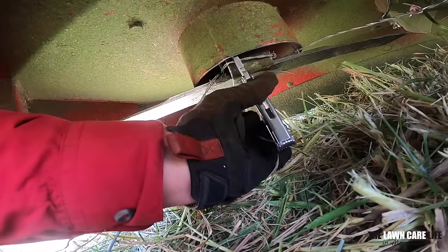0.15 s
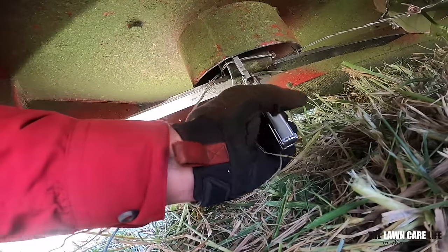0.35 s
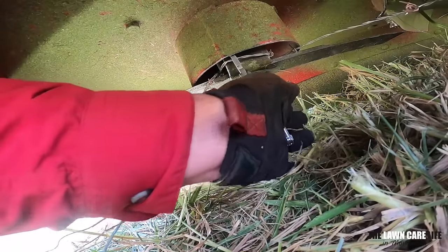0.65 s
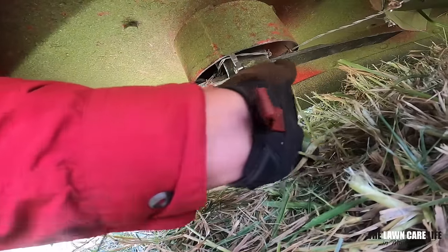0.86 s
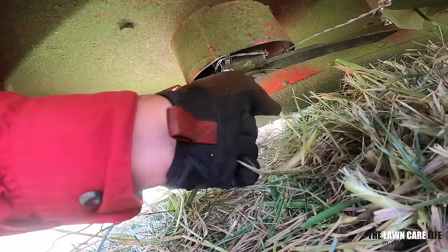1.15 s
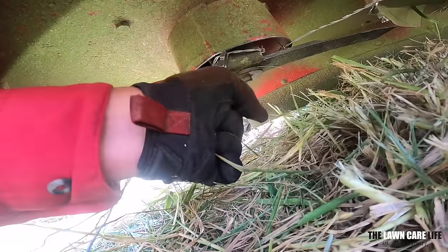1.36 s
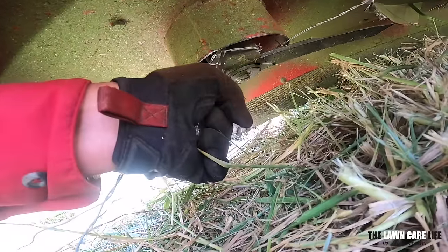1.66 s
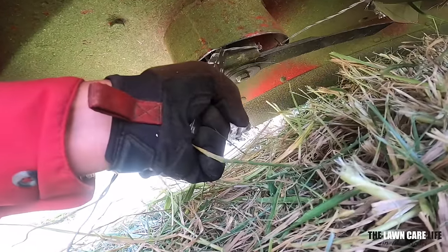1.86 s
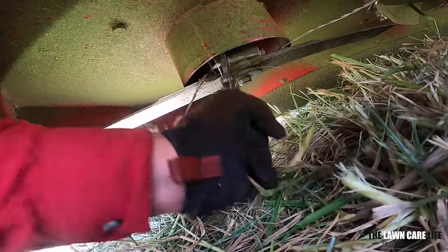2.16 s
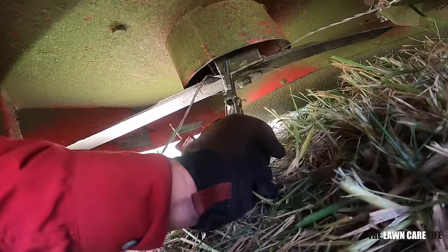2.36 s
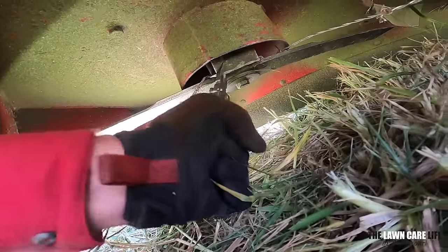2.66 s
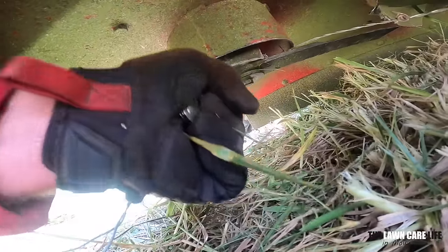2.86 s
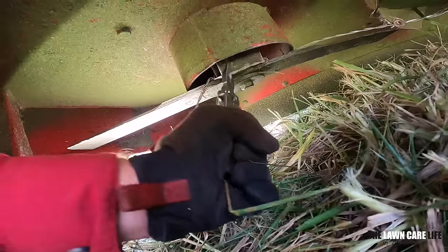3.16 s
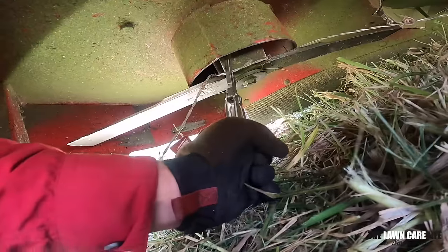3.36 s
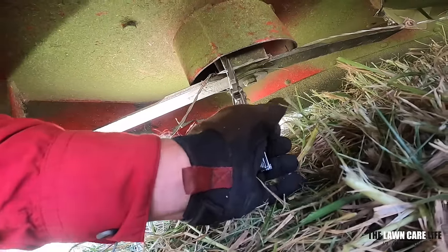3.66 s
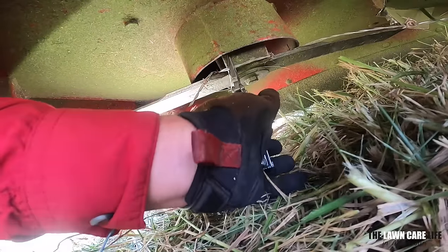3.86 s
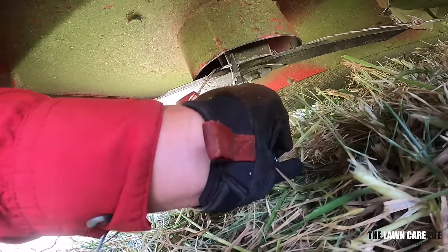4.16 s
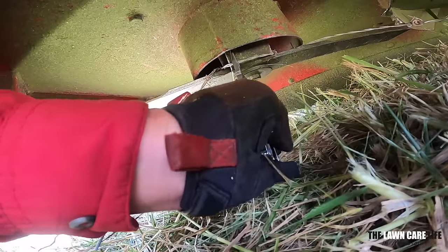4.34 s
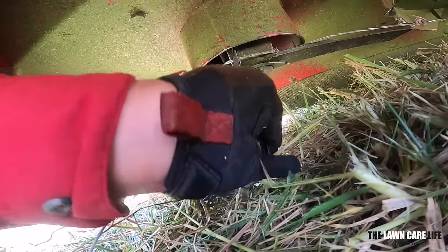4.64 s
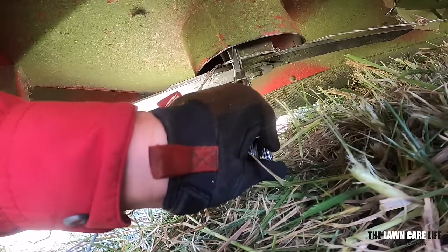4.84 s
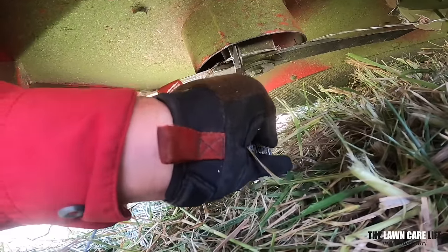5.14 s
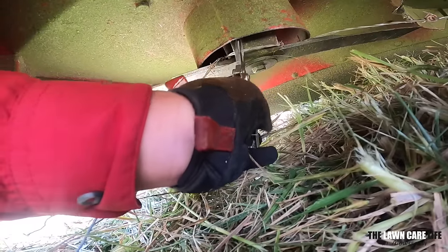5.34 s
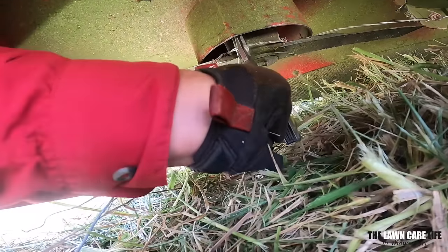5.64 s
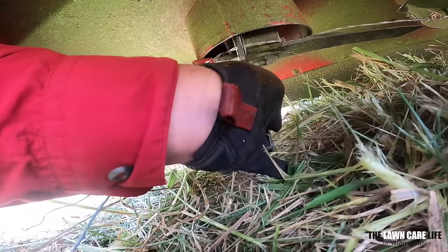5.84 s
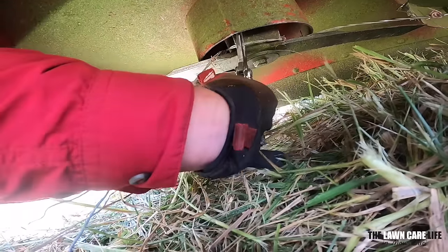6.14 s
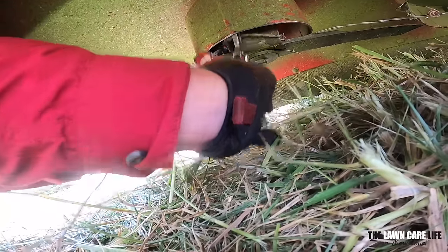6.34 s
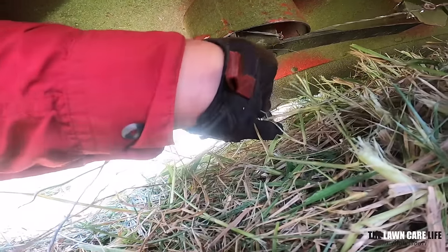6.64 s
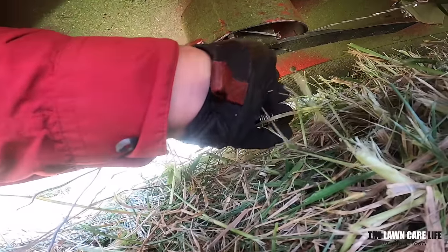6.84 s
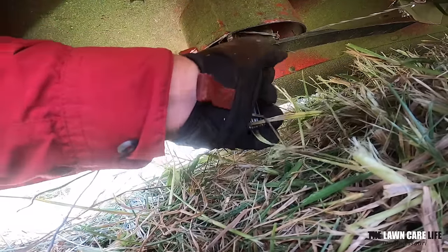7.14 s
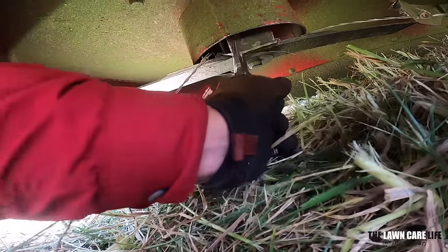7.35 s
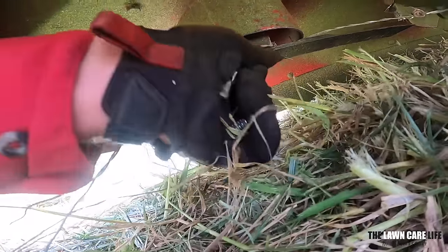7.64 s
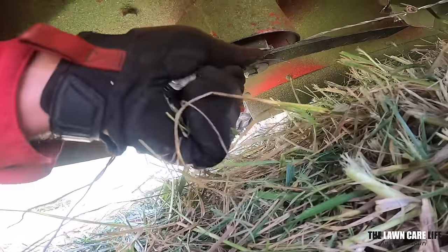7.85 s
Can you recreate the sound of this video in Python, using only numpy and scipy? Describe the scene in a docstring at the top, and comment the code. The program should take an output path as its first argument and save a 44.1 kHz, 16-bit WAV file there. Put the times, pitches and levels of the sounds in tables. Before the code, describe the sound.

Pliers pull and cut wire wound round a mower blade, heard close up beneath the steel deck. Gritty clanks and sharp snaps come in uneven clusters, each knock briefly ringing the blade and thumping the deck. After a quieter stretch of light ticks and glove rustle in grass, hard knocks crowd in and the wire grates on steel. Faint insects on the left and a far rumble continue throughout.

```python
"""Pliers pull and cut wire wound round a mower blade, heard from under the steel deck.
From the start, glove and grass rustle over insects on the left and a far rumble with a faint hum.
At 0.9-3.4 s wire and jaws slip in clusters: each grit burst rings blade and pliers and thumps the deck;
hard knocks shake the camera. Strands or stalks snap. Light knocks follow; from 6.3 s hard ones
crowd in, and the wire drags loudest near 7.6 s."""
import sys
import numpy as np
from scipy import signal
from scipy.fft import rfft, irfft
from scipy.io import wavfile

SR = 44100
rng = np.random.default_rng(int(sys.argv[2]) if len(sys.argv) > 2 else 0)


def wav_record(signal):
    """Record a signal, one row per channel, as 16-bit PCM in the file named by sys.argv[1]."""
    frames = np.transpose(np.atleast_2d(signal))
    bounded = np.clip(frames, -1, 1)
    # unit amplitude maps onto the largest positive 16-bit level
    quanta = np.round(bounded * 32767).astype(np.int16)
    wavfile.write(sys.argv[1], SR, quanta)


N = 352800

# wire or jaw slips: t/s, level/dB, bite f/Hz, treble/dB, thump f/Hz, thump/dB, blade f/Hz, blade/dB,
# pliers/dB, grit t60/s; treble, blade and pliers relative to level; the 28 Hz thump is a camera jolt
SLIPS = [(0.155, -31, 1950, -36, 221, -60, 1534, -45, -33, 0.25),
         (0.78, -67, 2000, -20, 292, -41, 700, -25, -30, 0.069),
         (0.8645, -9.5, 2140, -19, 278, -17, 936, -20.5, -20.5, 0.063),
         (0.9131, -11.5, 2170, -21, 292, -19.5, 1190, -35, -33, 0.073),
         (0.9286, -8.5, 3060, -36, 297, -16, 1160, -28, -38, 0.04),
         (1.289, -10.5, 3390, -37, 213, -33.5, 1190, -28, -36, 0.073),
         (1.4655, -42, 3060, -18, 300, -55, 1130, -31, -7, 0.13),
         (2.0497, -77, 2060, -27, 296, -38, 522, -25, -33, 0.018),
         (2.098, -57, 950, -25, 96, -33, 940, -31, -33, 0.03),
         (2.1792, -34, 1510, -29, 259, -29.5, 910, -19, -25, 0.061),
         (2.2457, -26, 3200, -20, 288, -30.5, 923, -19, -12, 0.29),
         (2.272, -45, 1120, -20, 28, -24, 1110, -25, -32, 0.023),
         (2.278, -3, 3180, -2.5, 219, -19, 1425, -27, -26, 0.062),
         (2.5201, -36, 2110, -22, 231, -57, 1376, -13, -10, .14),
         (2.6603, -32.5, 3000, -2, 234, -54, 1390, -19, -28, 0.35),
         (2.7554, -8.5, 3650, -40, 217.7, -15.5, 1393, -25, -28, 0.064),
         (2.9038, -29, 2050, 0.5, 222, -29, 1400, -19, -11, 0.15),
         (2.94, -16.5, 2300, -25, 247, -32, 1470, -34, -25.5, 0.03),
         (2.969, -22.5, 2020, -3, 238, -39, 1120, -30, -44, 0.042),
         (3.3642, -13.5, 3720, -2, 216, -29.5, 1390, -26.5, -19.5, .1),
         (3.4072, -21.5, 3940, 1, 285, -31.5, 910, -26, -22, .11),
         (4.6187, -44, 1490, -24, 250, -46, 1403, -14, -26, .059),
         (4.7368, -32, 2780, 7.5, 212, -43.5, 1460, -31, -8, 0.039),
         (4.77, -31, 2960, -9, 214, -53, 1490, -42, -29, 0.051),
         (4.9225, -48, 4200, 10, 225, -50, 1420, -34, -28, 0.13),
         (5.416, -53.5, 1480, -20, 213, -51, 1420, -16, -28, 0.058),
         (5.6452, -36.5, 2310, -3, 210, -50.5, 1060, -34, -22, 0.11),
         (6.3102, -37.5, 3120, 5, 240, -67, 1540, -37, -21, 0.15),
         (6.3395, -28, 3870, -9, 239, -62, 850, -48, -31, 0.019),
         (6.3806, -44, 1450, -23, 215, -62, 920, -11, -21, .11),
         (6.4033, -26.5, 3080, -22, 215, -38, 1440, -19, -22, 0.094),
         (6.4206, -15, 3120, -12, 212, -33, 916, -25, -25, .1),
         (6.4534, -7, 3080, -3, 202, -27.5, 964, -30, -32, 0.057),
         (6.4659, -18.5, 2920, -11, 236, -29, 1110, -22, -2, .16),
         (6.889, -28, 3430, -24, 221, -61, 666, -38, -30, 0.025),
         (6.9236, -28, 2800, -4, 234, -47, 1300, -28, -13.5, 0.11),
         (6.947, -36, 1500, -25, 234, -58, 1190, -35, -30, 0.049),
         (6.9932, -28.5, 1226, -25, 272, -31.5, 1170, -20, -38, 0.028),
         (7.2934, -26.5, 4140, -20, 220, -41.5, 1200, -24, -15, 0.22),
         (7.3194, -18.5, 2520, -19, 220, -44, 1460, -23, -11, .15),
         (7.3422, -10.5, 2800, -1.5, 229, -38, 1470, -24.5, -11, 0.077),
         (7.3564, -6.5, 3040, -7, 246, -23.5, 910, -28.5, -19.5, 0.072),
         (7.471, -16.5, 2100, -1, 214, -27.5, 1390, -29.5, -24, 0.04),
         (7.5377, -16, 4420, 0, 240, -27, 700, -36, -19, 0.039),
         (7.5921, -14, 2240, 3, 229, -27, 980, -31, -20, 0.025),
         (7.6253, -12.5, 3600, -22, 304, -26, 1440, -30, -16, 0.079),
         (7.6998, -10, 2150, -5.5, 213, -25, 886, -31.5, -31, 0.061),
         (7.7715, -29, 2130, 0, 227, -32, 950, -34, -31, .086),
         (7.9596, -11.5, 3000, -1.5, 213, -25, 1230, -27, -21, 0.044),
         (7.9873, -15.5, 5300, -9, 214, -24, 910, -30, -19, 0.099)]
# ring time until wire or hand mutes it: slip level/dB, t/s
MUTE_DELAY = [(-45, .035), (-30, .11), (-10, .1), (-3, .25)]
# modes of blade with spindle, and of pliers: f/Hz, level/dB, t60/s
BLADE_MODES = [(571, -9, .9), (700, -9, .3), (829, -14, .3), (912, -3, .3), (945, -12, .5), (1034, -4, .2),
               (1118, -4, .18), (1190, -7, .15), (1389, -4, .23), (1457, -5, .3), (1472, -8, .55),
               (1529, -16, .7), (1895, -14, .2), (2060, -8, .2), (2213, -10, .2), (2305, -14, .25),
               (2390, -12, .15), (2787, -8, .15), (3295, -16, .2), (3881, -17, .2), (4240, -16, .2),
               (4829, -18, .25), (5120, -17, .2), (6870, -24, .15)]
PLIERS_MODES = [(2912, 0, .26), (4662, -9, .2), (5965, -12, .19), (7650, -28, .15)]
# deep thump of the jolted camera (first row), then deck modes: f/Hz, level/dB, t60/s
THUMP_MODES = [(28.6, -10, 0.52), (59.5, -14.5, 0.8), (97, 0.5, 0.42), (162.3, 1, 0.17), (199.6, -4, 0.36),
               (229.2, -6.5, 0.42), (291.8, -8.5, 0.282), (353.8, -10, 0.34), (410.8, -12.5, 0.28)]
# strand or stalk snaps: t/s, level/dB, f/Hz, treble/dB, t60/s, left minus right/dB
SNAP_EVENTS = [(0.733, -41, 1800, -12, 0.013, -5), (1.181, -32, 1500, 2, 0.019, -4),
               (1.29, -4.5, 3700, -23, 0.016, 4.5), (1.51, -37, 4850, -17, .012, 3),
               (2.006, -46, 2300, -14, .012, -7), (3.0828, -28.5, 3650, -10, 0.012, 8),
               (3.1944, -47, 1840, -10, .012, 4), (3.291, -26.5, 4240, -18, 0.021, 0),
               (3.7323, -28.5, 2040, -9, 0.0075, -1), (4.575, -42, 8500, -6, .012, 0),
               (6.0925, -34, 4660, -12, .01, 6), (7.0374, -12.5, 1650, -29, 0.038, -1.5),
               (7.0416, -21, 1650, -7, 0.0066, -2), (7.137, -43, 1750, -10, 0.013, 3),
               (7.6594, -12.5, 1990, -3, .02, -5), (7.6785, -26, 2170, 13, 0.0095, -9),
               (7.8319, -12.5, 2570, -8, 0.016, -8)]
# wire dragging on steel: t/s, level/dB
DRAG_LEVELS = [(0.0, -58), (0.47, -67), (0.96, -49.5), (1.98, -76), (2.16, -69), (2.36, -52.5),
               (2.85, -43.5), (3.03, -63), (3.25, -51.5), (3.36, -56.5), (4.3, -77), (4.84, -61),
               (5.37, -71.5), (5.84, -72), (6.11, -69), (6.46, -67.5), (6.64, -69), (7.33, -52.5),
               (7.48, -47), (7.62, -33), (7.93, -59.5), (8.0, -63)]
# glove and sleeve on grass: t/s, length/s, level/dB
BRUSH_EVENTS = [(0.0, .28, -63.5), (0.586, 0.27, -57), (0.859, 0.27, -54), (1.183, 0.23, -62.5),
                (1.492, 0.4, -71), (2.148, 0.25, -57.5), (2.487, 0.34, -56.5), (2.893, 0.17, -64.5),
                (3.23, 0.23, -62.5), (3.343, 0.17, -61.5), (3.598, 0.67, -61.5), (4.4, .22, -67.5),
                (4.692, 0.074, -62), (4.88, 0.28, -69.5), (5.642, 0.27, -59), (6.087, .1, -62.5),
                (6.24, 0.22, -58), (6.4, 0.19, -60.5), (6.777, 0.34, -66), (7.238, 0.23, -58),
                (7.433, .3, -46.5), (7.768, .08, -53.5), (7.948, .1, -60)]
# noise density shapes: f/Hz, level/dB
GRIT_SPECTRUM = [(120, -12), (300, -2.5), (600, -40), (1000, -2.5), (1500, -5.5), (2200, -8.5),
                 (3200, -5.5), (5000, -5), (8000, -16), (11000, -28), (15500, -48)]
RUSTLE_SPECTRUM = [(290, -54), (500, 2.5), (1430, 9), (1600, 0.5), (1960, 11), (4980, 7), (6930, 4),
                   (12100, -5.5), (15500, -19)]
RUMBLE_SPECTRUM = [(12, -31), (20, -15.5), (48, 0.5), (107, 1), (136, -6.5), (198, -11.5), (295, -24),
                   (329, -26.5), (401, -29), (536, -45.5), (1210, -69), (1320, -64), (1500, -33.5),
                   (1950, -65), (3300, -120)]
# insect song: f/Hz, width/Hz, level/dB
INSECT_BANDS = [(3676, 800, 8.5), (4300, 80, 9), (4260, 2200, 3.5), (4930, 530, 13.5), (5504, 33, 4),
                (5000, 63, -3.5), (5930, 200, 3.5), (6140, 550, 2)]
# insect background, with preset dips for gain control ducking after loud knocks: t/s, level/dB
DUCKED_INSECT_LEVELS = [(0.0, -53), (0.22, -55.5), (2.21, -53.5), (2.4, -58.5), (3.65, -58), (6.32, -54.5),
                        (7.2, -57.5)]
# left against right: f/Hz, level/dB
LEFT_GAIN = [(100, 0), (400, 0), (700, 1.5), (5000, 1.5), (7000, -4), (9000, -9), (15000, -7)]
# left against right: f/Hz, lag/rad
LEFT_LAG = [(50, 0), (700, .2), (1500, .4), (3200, .8), (4400, 1.4), (6000, 2.2), (8000, 1.3), (15000, 1.3)]

TIME_S, RING_TIME_S = np.arange(N) / SR, np.arange(SR // 2) / SR
SIDE = np.array([[1], [-1]])   # left plus, right minus


def slips(bite_db=-4, clunk_db=-16.5, sheet_count=48):
    """Wire or jaw slips on steel: grit bursts, blade and pliers ring, deck and jolted camera thump."""
    grit, white = coloured(grains(12000, spread_db=4.5), GRIT_SPECTRUM), grains(6000, spread_db=2.0)
    treble = unit_rms(butter(grit, 2, 6000, "high"))
    hollow = unit_rms(butter(white, 2, [200, 1000], "band"))
    blade, thumps = free_rings(BLADE_MODES), free_rings(THUMP_MODES)
    pliers = free_rings(PLIERS_MODES).sum(axis=0)
    blade_draws = rng.normal(0, 1, (len(SLIPS), len(BLADE_MODES)))
    sheet_hz = np.geomspace(800, 9000, sheet_count) * rng.uniform(0.92, 1.03, sheet_count)
    sheet_cycles = sheet_hz[:, None] * RING_TIME_S[:SR // 6] + rng.random((sheet_count, 1))
    sheet = np.sin(2 * np.pi * sheet_cycles)
    sheet_draws = rng.normal(0, 1, (len(SLIPS), sheet_count))
    gaps_s = np.diff([row[0] for row in SLIPS], append=N / SR)
    out = np.zeros(N + SR)
    for row, gap_s, blade_draw, sheet_draw in zip(SLIPS, gaps_s, blade_draws, sheet_draws):
        t_s, db, bite_hz, treble_db, thump_hz, thump_db, blade_hz, blade_db, pliers_db, t60_s = row
        rise_s = .001 + .02 * t60_s
        start = round((t_s - 2 * rise_s) * SR)
        envelope = burst(rise_s, t60_s)[:N - start]
        span = slice(start, start + len(envelope))
        bite = unit_rms(resonance(white[span], bite_hz, 0.064 * bite_hz))
        scrape = grit[span] + amp(bite_db) * bite + amp(treble_db) * treble[span]
        out[span] += amp(db - 13.5) * envelope * scrape
        clunk = amp(thump_db + 0.28 * (db - thump_db) + clunk_db) * hollow[span]
        out[span] += burst(1.38 * rise_s, 3.32 * t60_s)[:N - start] * clunk   # lows last longer

        # each blow wakes other short-lived modes of the deck sheet
        sheet_db = at_hz(GRIT_SPECTRUM, sheet_hz) + contact_db(sheet_hz[:, None], bite_hz, 3.7, 0.17)
        clank = amp(sheet_db + 4.5 * sheet_draw) @ sheet
        out[span] += amp(db - 32.5) * (burst(rise_s, 2.06 * t60_s) * clank)[:N - start]

        boost_db = contact_db(BLADE_MODES, blade_hz, 11, .05) + contact_db(BLADE_MODES, bite_hz, 10, .06)
        blade_gains = amp(blade_db + boost_db + 2.5 * blade_draw) * np.sign(np.roll(blade_draw, 1))
        swell = 1 - np.exp(-RING_TIME_S / rise_s)
        mute_s = min(max(gap_s, .1), np.interp(db, *np.transpose(MUTE_DELAY)))
        mute = 1 / (1 + np.exp((RING_TIME_S - mute_s) / .015))
        rings = amp(db) * swell * mute * (blade_gains @ blade + amp(pliers_db - 1.5) * pliers)
        thump_gains = amp(thump_db - 9 + contact_db(THUMP_MODES, thump_hz, 13.3, 0.16))
        thump = thump_gains @ thumps * (1 - np.exp(-RING_TIME_S / 0.0016))
        hit = round(t_s * SR)
        out[hit:hit + len(RING_TIME_S)] += rings + thump
    return out[:N]


def snaps(width_hz=1300):
    """Strand or stalk breaks: a click and a noisy tail in a broad resonance, with a bright edge."""
    out, white = np.zeros((2, N)), rng.standard_normal((len(SNAP_EVENTS), SR // 6))
    for (t_s, db, hz, treble_db, t60_s, pan_db), noise in zip(SNAP_EVENTS, white):
        click = .25 * noise * burst(1e-4, t60_s)
        click[4] = 3.0
        body = resonance(resonance(click, hz, width_hz), hz, 2 * hz)
        edge = amp(treble_db) * resonance(click, 7700, 8100) / 2
        snap = body / np.max(np.abs(body)) + edge
        start = round(t_s * SR)
        out[:, start:start + len(snap)] += amp(db + SIDE * pan_db / 2) * snap
    return out


def wire_drag():
    """Wire catches in uneven clumps: it grates, keeps the blade singing and drums the deck."""
    drag_db = np.interp(TIME_S, *np.transpose(DRAG_LEVELS))
    catches = amp(drag_db - 45.5 + 6.4 * drift(15)) * grains(4000, spread_db=0)
    drumming = amp(-88 + 0.77 * (drag_db - drag_db.mean())) * rng.standard_normal(N)
    grating = amp(drag_db - 11 + 8.1 * drift(49)) * coloured(grains(12000, spread_db=1), GRIT_SPECTRUM)
    return driven_rings(catches, BLADE_MODES[2:18]) + driven_rings(drumming, THUMP_MODES) + grating


def rustle(attack_s=0.015, release_s=0.02, rest_db=-68):
    """Cloth brushes dry stalks: clumped fine grains, partly different on each side."""
    level = amp(rest_db)
    for t_s, length_s, db in BRUSH_EVENTS:
        attack = np.exp(np.minimum(TIME_S - t_s, 0) / attack_s)
        release = np.exp(np.minimum(t_s + length_s - TIME_S, 0) / release_s)
        level = level + amp(db) * np.minimum(attack, release)
    mid, side = (coloured(grains(9000, spread_db=4.0), RUSTLE_SPECTRUM) for _ in range(2))
    clumps = amp(2.0 * drift(18))
    return level * clumps * (mid + 0.79 * side * SIDE)


def camera_shudder(gain_db=-22.5, slope=1.53, t60_s=1):
    """Rms of the low rumble of the camera shaken by knocks; steeply more for hard ones."""
    power = np.zeros(N)
    for t_s, db, *_ in SLIPS:
        power[round(t_s * SR)] = amp(slope * db + gain_db) ** 2
    return np.sqrt(signal.lfilter([1], [1, -amp(-120 / (t60_s * SR))], power + 1e-18))


def deck_echoes(x, t60_s=0.087, wet_db=-5.5, hand_shift_s=.25):
    """Dense reflections between deck and ground; the paths change as the hand shifts."""
    t_s, hop = np.arange(round(.15 * SR)) / SR, round(hand_shift_s * SR)
    out, fade = np.zeros((2, N + 4 * hop)), signal.windows.hann(2 * hop, sym=False)
    x = np.pad(x, ((0, 0), (hop, 2 * hop)))
    for i in range(0, N + hop, hop):
        tail = rng.standard_normal((2, len(t_s))) * amp(-60 * t_s / t60_s) * (t_s > .0005)
        tail = butter(tail, 1, 200, "high")   # long waves pass unscattered
        tail = tail + 0.33 * np.diff(tail, prepend=0)   # short waves scatter most
        tail /= np.sqrt(np.sum(tail ** 2) / 2)
        wet = signal.fftconvolve(x[:, i:i + 2 * hop] * fade, tail, axes=1)
        out[:, i:i + wet.shape[1]] += wet
    return amp(wet_db) * out[:, hop:hop + N]


def shade_left(x):
    """Close sounds reach the left later and with less top."""
    hz = np.fft.rfftfreq(N, 1 / SR)
    response = amp(at_hz(LEFT_GAIN, hz)) * np.exp(-1j * at_hz(LEFT_LAG, hz))
    return np.array([irfft(rfft(x[0]) * response, N), x[1]])


def insects():
    """Many far singers blur into throbbing noise bands, mostly on the left."""
    chorus = 0
    for hz, width_hz, db in INSECT_BANDS:
        throb = amp(1.5 * drift(58) + drift(1.9))
        mid, side = resonance(resonance(rng.standard_normal((2, N)), hz, width_hz), hz, 2 * width_hz)
        chorus = chorus + amp(db) * throb * (mid + .5 * side * SIDE) / np.std(mid)
    ducked_db = np.interp(TIME_S, *np.transpose(DUCKED_INSECT_LEVELS))
    return amp(ducked_db + np.array([[2.0], [-3.0]])) * unit_rms(chorus)


def rumble(shudder_rms, floor_db=-42, hum_hz=241.7, hum_db=-61):
    """Far low noise, nearly mono, with a wavering hum; the camera shudder swells the same noise."""
    mid, side = (coloured(white, RUMBLE_SPECTRUM) for white in rng.standard_normal((2, N)))
    hum_level = amp(hum_db + 2.0 * drift(3.4))
    hum = hum_level * np.sin(2 * np.pi * np.cumsum(hum_hz + drift(0.95)) / SR)
    level = np.hypot(amp(floor_db + 0.79 * drift(0.65)), shudder_rms)
    return level * (mid + amp(-22.5) * side * SIDE) + hum


def burst(rise_s, t60_s):
    """Envelope: swells for three rise times, then dies."""
    t_s = np.arange(SR // 6) / SR
    swell = np.exp(np.minimum(t_s / rise_s - 3, 0))
    return np.where(t_s < 3 * rise_s, swell, amp(-60 * (t_s - 3 * rise_s) / t60_s))


def contact_db(modes, hz, gain_db, width_oct):
    """Boost of modes near the pitch favoured by the point of contact."""
    return gain_db * np.exp(-(np.log2(np.array(modes)[:, 0] / hz) / width_oct) ** 2)


def free_rings(modes):
    """One decaying sine per mode."""
    hz, db, t60_s = np.transpose(modes)[:, :, None]
    return amp(db - 60 * RING_TIME_S / t60_s) * np.sin(2 * np.pi * hz * RING_TIME_S)


def driven_rings(force, modes):
    """Sum of two-pole modes driven by one force."""
    out = 0
    for hz, db, t60_s in modes:
        r, w = amp(-60 / (t60_s * SR)), 2 * np.pi * hz / SR
        out += amp(db) * signal.lfilter([0, np.sin(w)], [1, -2 * r * np.cos(w), r * r], force + 1e-18)
    return out


def resonance(x, hz, width_hz):
    """Band-pass, peak gain 1."""
    r, w = np.exp(-np.pi * width_hz / SR), 2 * np.pi * hz / SR
    return signal.lfilter(np.array([1, 0, -1]) * (1 - r * r) / 2, [1, -2 * r * np.cos(w), r * r], x)


def grains(per_s, spread_db):
    """Random clicks; rms 1."""
    sizes = amp(spread_db * np.minimum(rng.exponential(1, N), 5)) * rng.choice([-1, 1], N)
    return unit_rms(sizes * (rng.random(N) < per_s / SR))


def drift(rate_hz):
    """Slow random wander; rms about 1."""
    r = np.exp(-80 * np.pi * rate_hz / SR)   # runs at SR / 40
    slow = signal.lfilter([1], [1, -2 * r, r * r], rng.standard_normal(N // 40 + 2002))[2000:]
    return np.interp(np.arange(N) / 40, np.arange(len(slow)), unit_rms(slow))


def coloured(x, spectrum):
    """Noise shaped by a spectrum; rms 1."""
    return unit_rms(irfft(rfft(x) * amp(at_hz(spectrum, np.fft.rfftfreq(N, 1 / SR))), N))


def at_hz(points, hz):
    """Table lookup over log frequency."""
    table_hz, values = np.transpose(points)
    return np.interp(np.log(np.maximum(hz, 1)), np.log(table_hz), values)


def butter(x, order, hz, kind):
    return signal.sosfilt(signal.butter(order, hz, kind, fs=SR, output="sos"), x)


def unit_rms(x):
    return x / np.sqrt(np.mean(x ** 2) + 1e-20)


def amp(db):
    return 10 ** (np.asarray(db) / 20)


def scene():
    """Close work under the deck, then the surroundings."""
    close = slips() + snaps() + wire_drag() + rustle()
    return shade_left(close + deck_echoes(close)) + insects() + rumble(camera_shudder())


def record(dry):
    """High-pass at 18 Hz; stopband from 16.1 kHz."""
    dry = butter(dry, 1, 18, "high")
    return signal.sosfilt(signal.cheby2(12, 70, 16100, fs=SR, output="sos"), dry)


dry = scene()
out = record(dry)
wav_record(out)
```